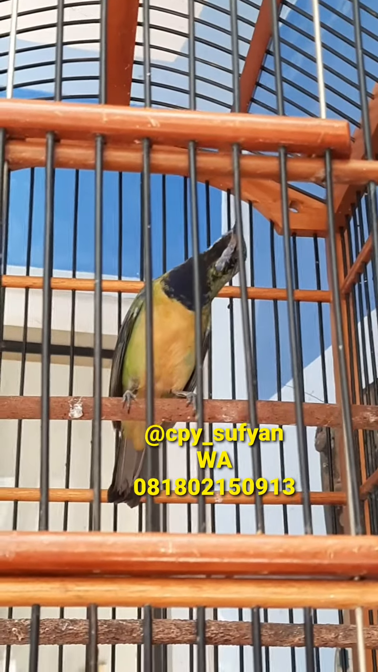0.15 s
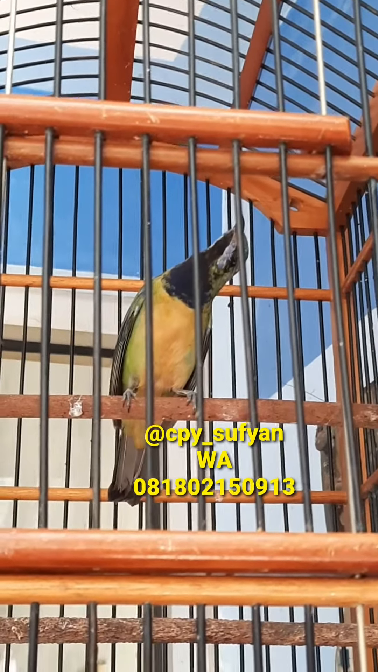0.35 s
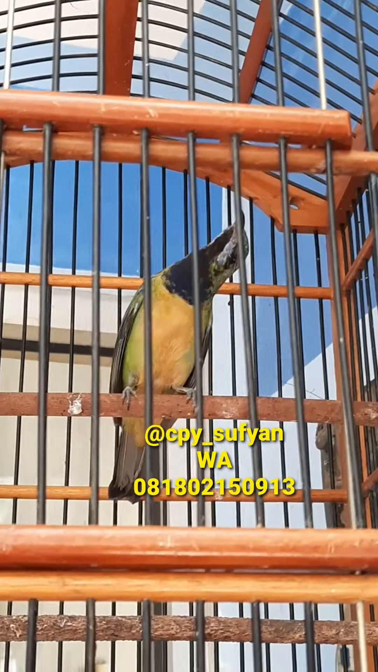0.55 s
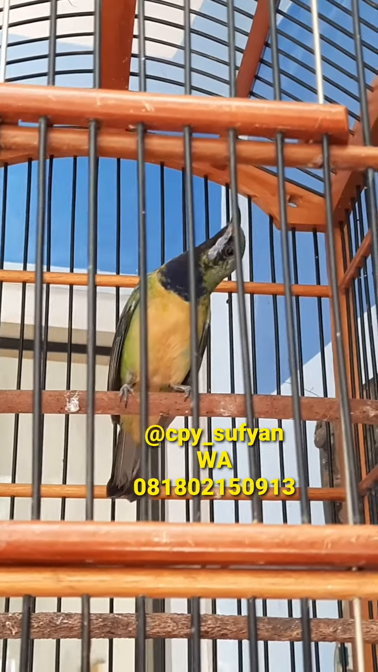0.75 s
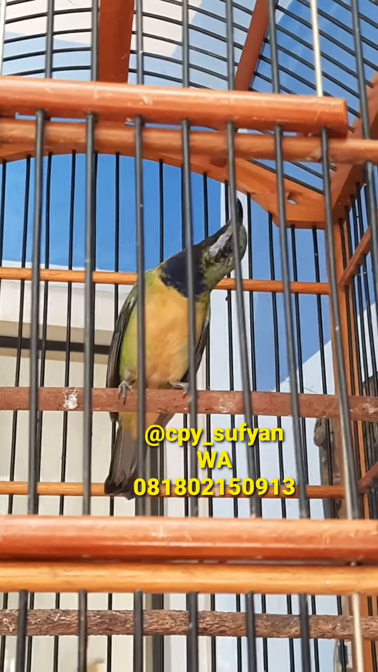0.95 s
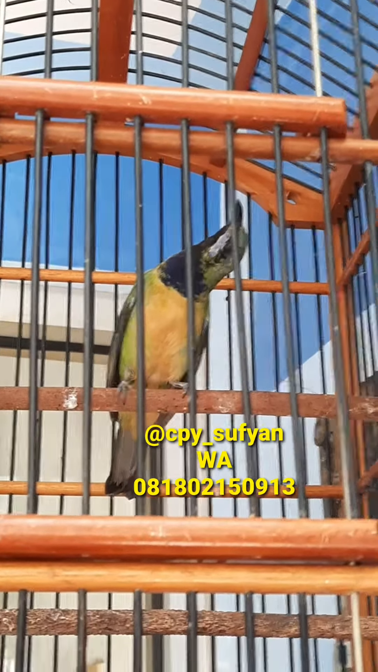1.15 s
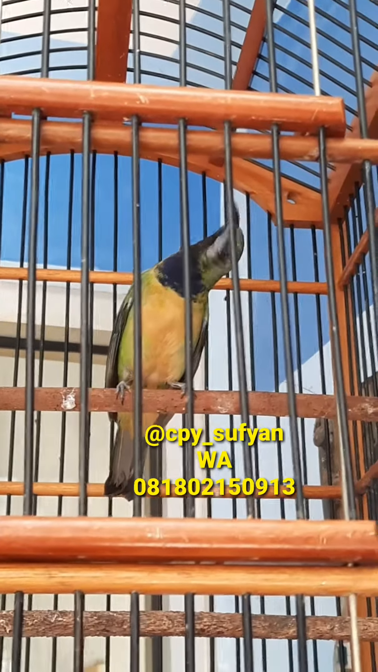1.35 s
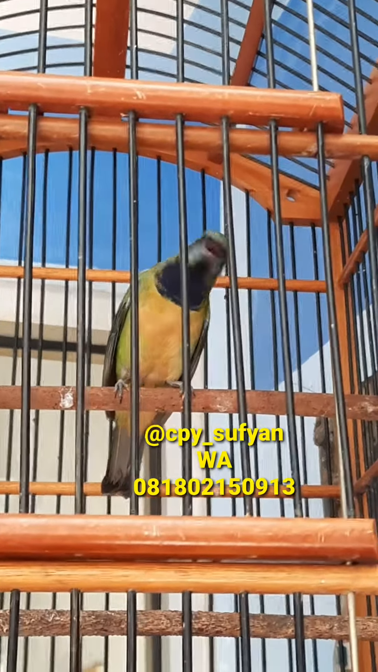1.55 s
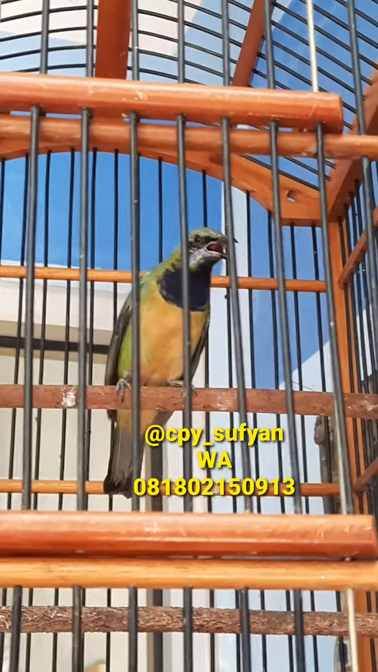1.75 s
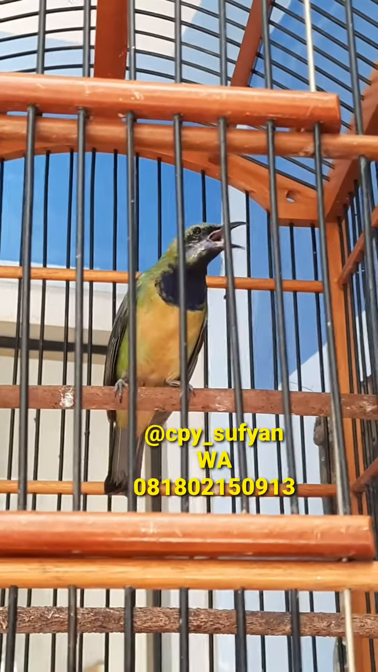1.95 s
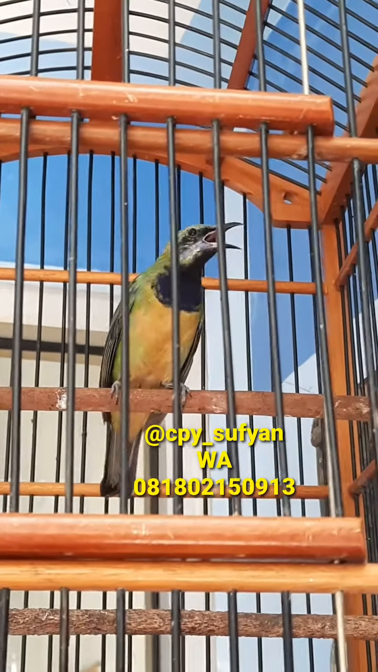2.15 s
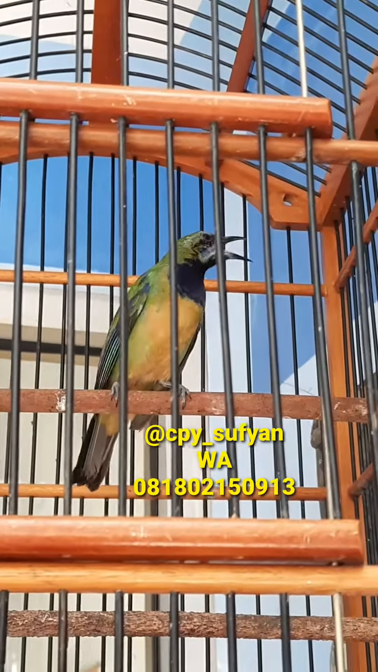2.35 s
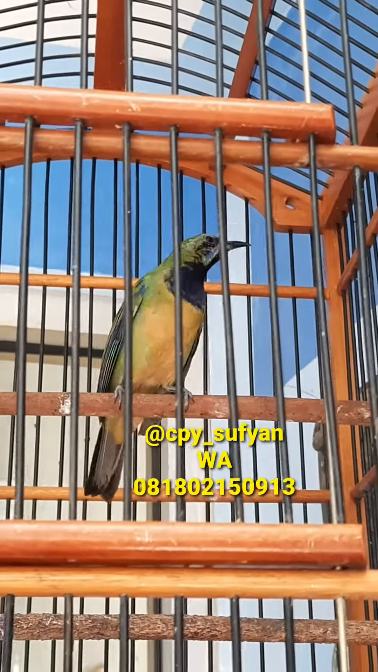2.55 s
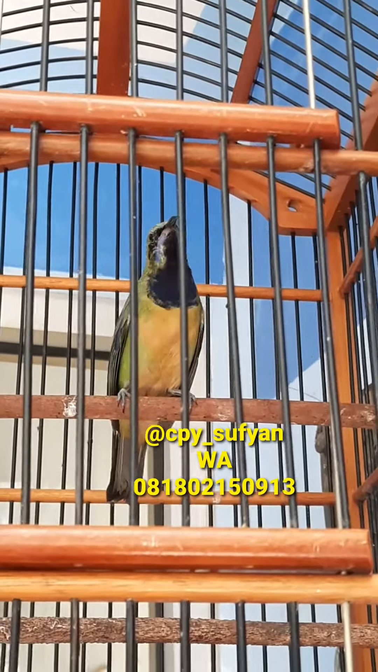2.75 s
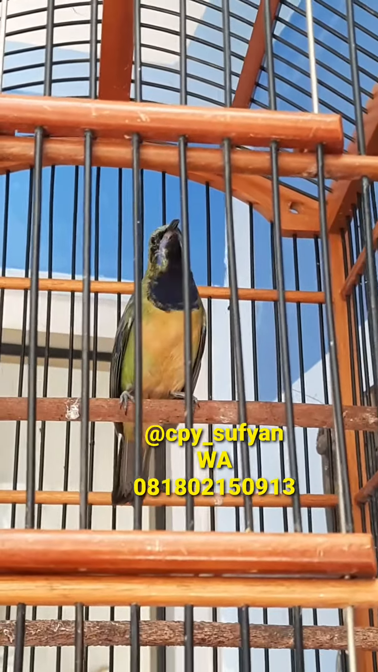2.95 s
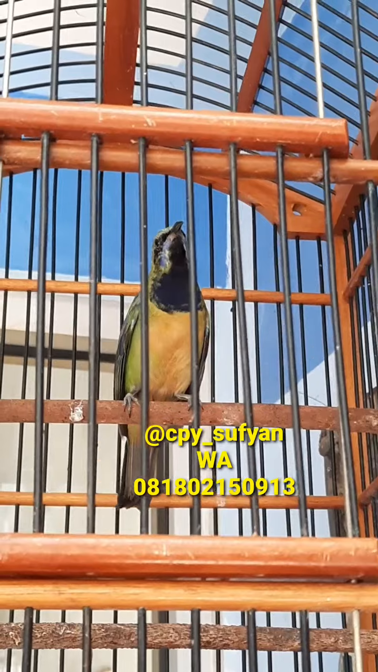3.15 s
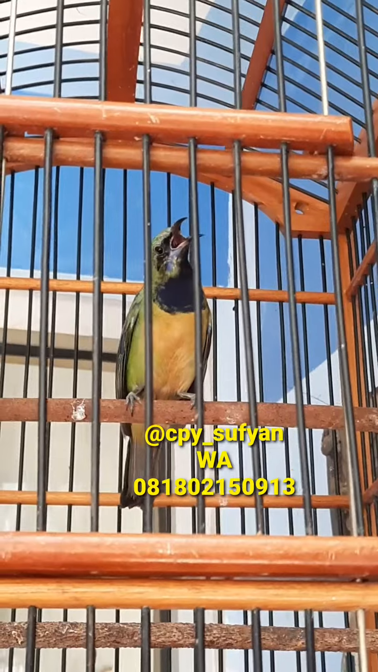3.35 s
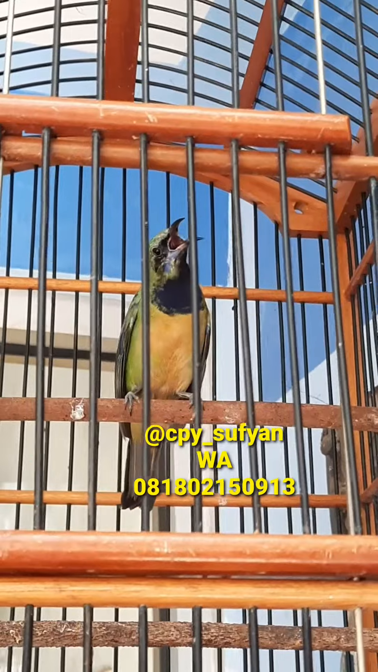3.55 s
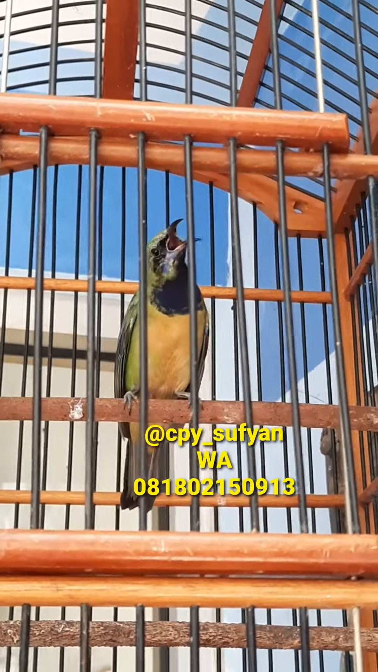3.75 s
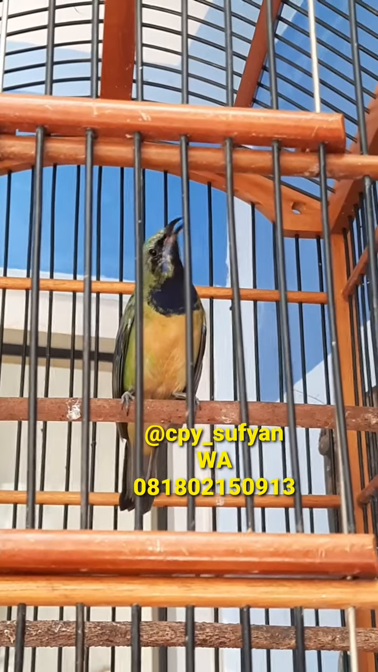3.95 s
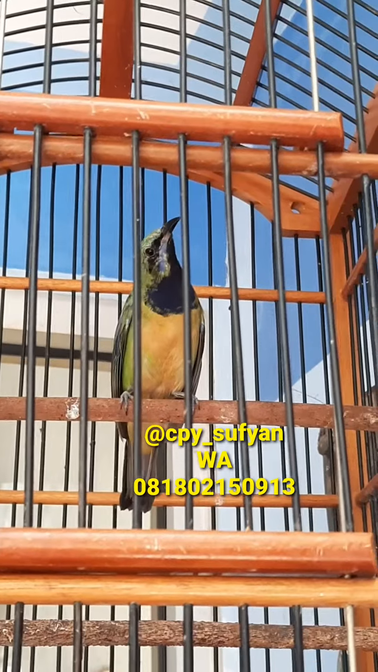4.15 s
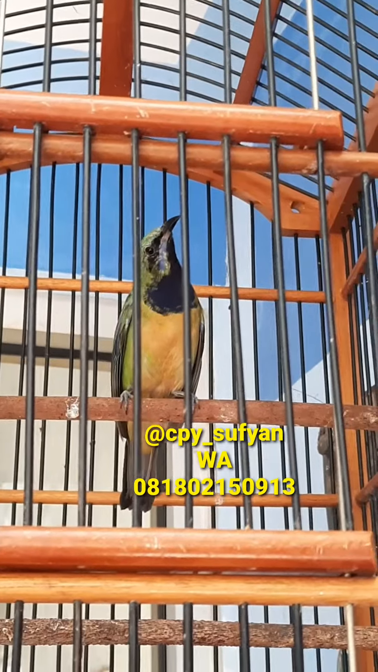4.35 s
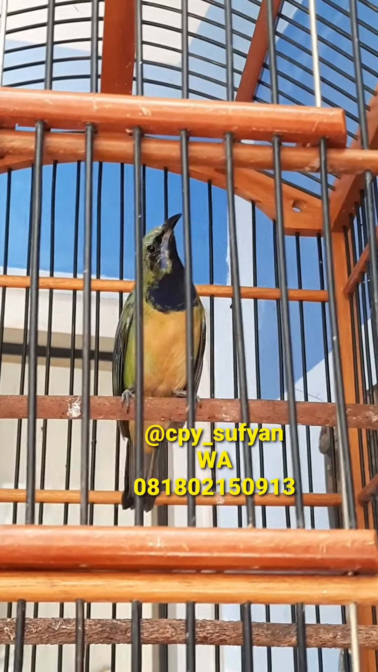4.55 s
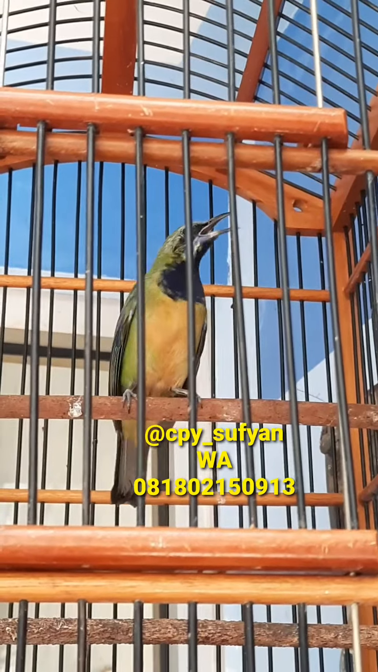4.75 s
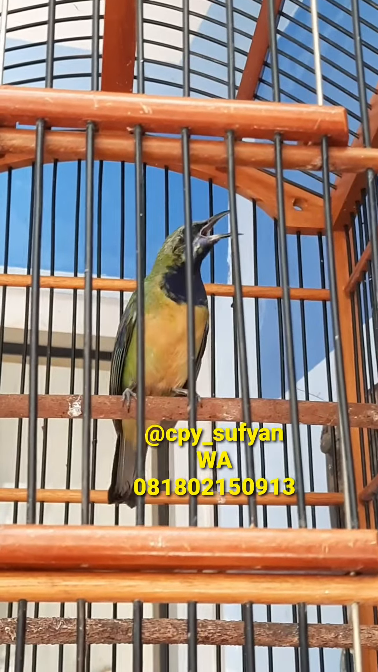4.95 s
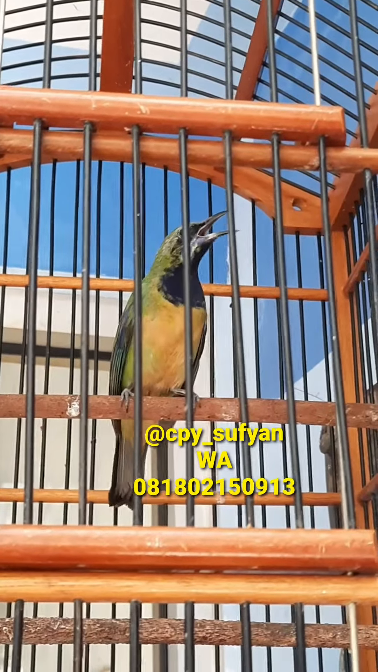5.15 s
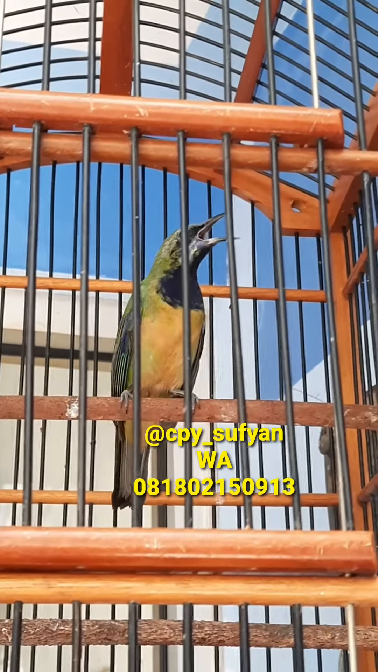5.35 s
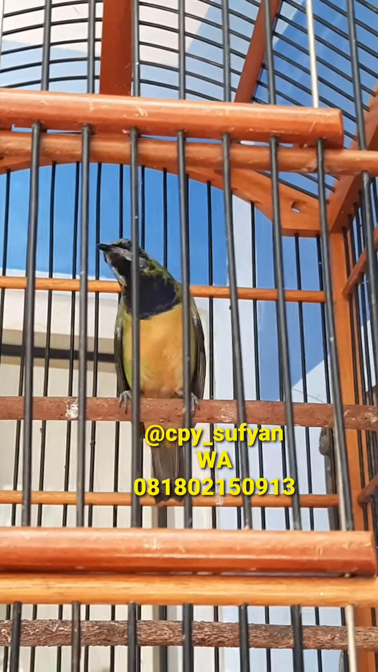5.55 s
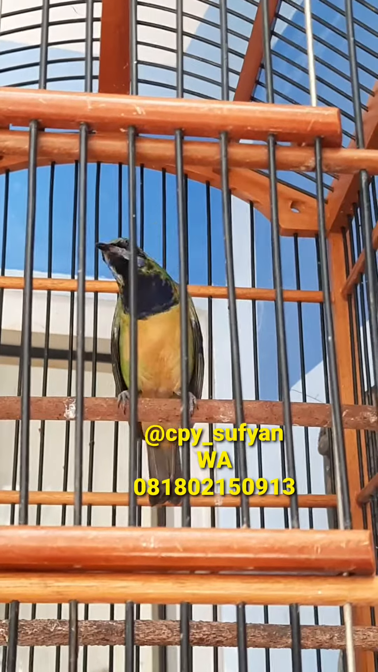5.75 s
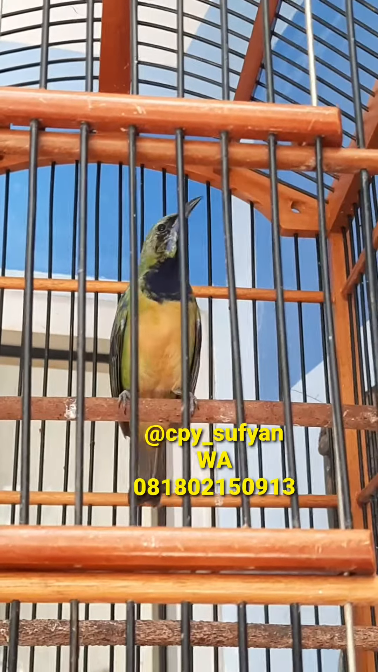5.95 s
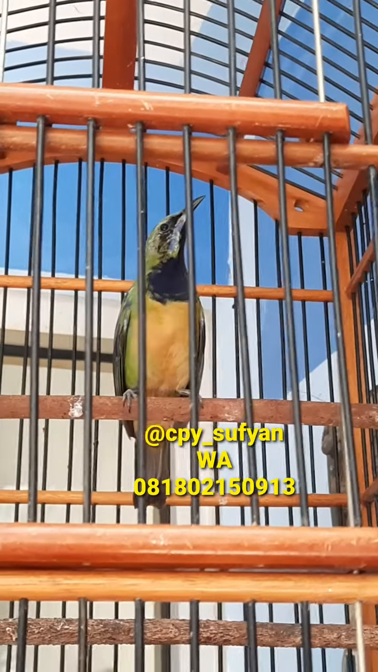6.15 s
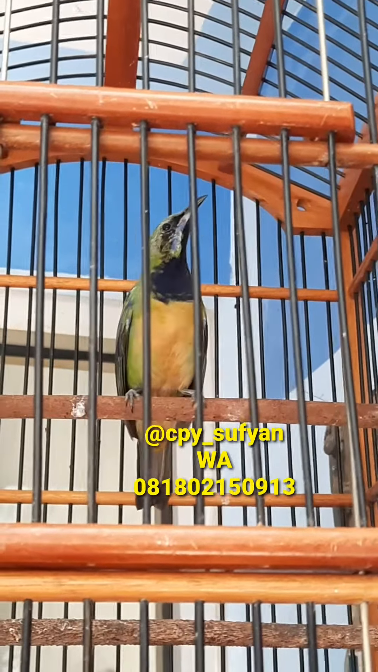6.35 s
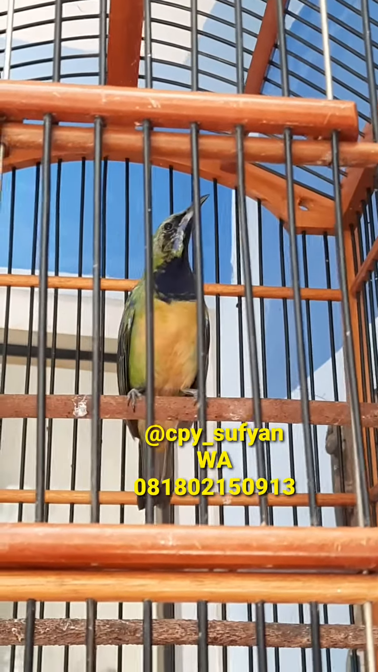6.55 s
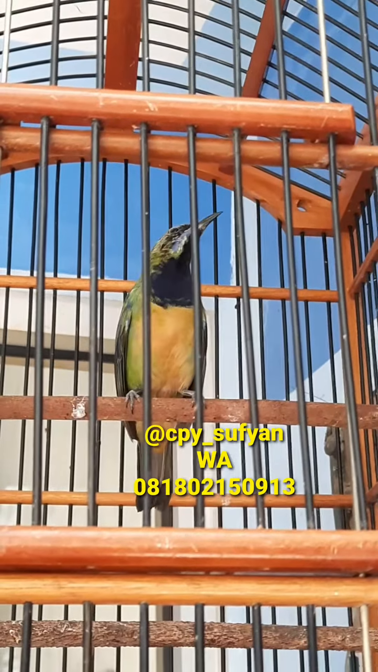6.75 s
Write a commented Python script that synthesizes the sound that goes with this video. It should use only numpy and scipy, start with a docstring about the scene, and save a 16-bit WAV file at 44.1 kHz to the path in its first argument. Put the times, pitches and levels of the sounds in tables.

```python
"""Three bursts of harsh chatter rattle out of a cage close by; sharp chips answer from a second bird on the right.
Both birds are noisy syrinx sounds, shaped by spectra and scattered by the cage; far birds whistle as rough sines.
Noise bands make the yard bustle and a faint drone, and ringing noise makes a few far knocks.
A small engine starts idling as a train of puffs in exhaust resonances, over a town hum of shaped noise."""
import sys
import numpy as np
from scipy import signal
from scipy.fft import rfft, irfft
from scipy.io import wavfile

SR = 44100
rng = np.random.default_rng(int(sys.argv[2]) if len(sys.argv) > 2 else 0)


def to_wav(sig):
    """Store sig (one row per channel, or 1-D mono) as 16-bit WAV at the path in sys.argv[1].

    Samples outside -1..1 are clipped; the rate is SR.
    """
    pcm = np.clip(np.atleast_2d(sig), -1, 1) * 32767
    pcm = np.round(pcm).astype(np.int16)
    wavfile.write(sys.argv[1], SR, pcm.T)  # frames by channels


N = 303849


def amp(db):
    """dB to gain."""
    return 10 ** (np.asarray(db) / 20)


def rms_one(x):
    """Scale to rms 1."""
    return x / np.sqrt(np.mean(x ** 2) + 1e-20)


def in_time(rows):
    """Draw a one-value automation curve at every sample."""
    s, value = np.transpose(rows)
    return np.interp(np.arange(N) / SR, s, value)


def at_hz(points, hz):
    """Read a curve on a log-frequency axis."""
    curve_hz, value = np.array(points).T
    return np.interp(np.log(hz), np.log(curve_hz), value)


def colour(x, db_at):
    """Equalise by a dB function of frequency."""
    size = x.shape[-1]
    hz = np.arange(1, size // 2 + 2) * SR / size
    return irfft(rfft(x) * amp(db_at(hz)), size)


def drift(rate, size):
    """Random wander of rms 1: noise through two equal one-pole low-passes at rate Hz."""
    r = np.exp(-2 * np.pi * rate / SR)
    wander = signal.lfilter([1], [1, -2 * r, r * r], rng.standard_normal(size + SR))
    return rms_one(wander[SR:])      # the first second lets the filter settle


def resonance(x, hz, width_hz):
    """Two-pole peak of gain 1."""
    r = np.exp(-np.pi * width_hz / SR)
    feedback = [1, -2 * r * np.cos(2 * np.pi * hz / SR), r * r]
    return signal.lfilter(np.array([1, 0, -1]) * (1 - r * r) / 2, feedback, x)


def add(track, s, sound):
    """Mix a sound in at s seconds."""
    i = round(s * SR)
    track[i:i + len(sound)] += sound[:N - i]


def rasp(size, uneven_db):
    """Chaotic syrinx: noise whose strength jumps from one millisecond to the next."""
    return rng.standard_normal(size) * amp(uneven_db * drift(620, size))


def voice(hz, size, wander, breath_db):
    """Unsteady syrinx: a harmonic-rich buzz whose pitch wanders fast, plus rasp."""
    pitch = hz * (1 + wander * drift(219.5, size) + wander * drift(29.02, size))
    phase = 2 * np.pi * np.cumsum(pitch) / SR
    buzz = sum(np.cos(k * phase) for k in range(1, 12))
    flicker = amp(3 * drift(400, size))
    return rms_one(buzz) * flicker + amp(breath_db) * rasp(size, uneven_db=4.5)


# chatter syllables: [t/s, relative level/dB, throat resonance f/Hz, swell t/s]
CHATTER = [(1.6304, -13, 5590, 0.0095), (1.699, -13, 5500, 0.0072), (1.77, -11, 3980, 0.016),
           (1.8468, -9.5, 5000, 0.019), (1.917, -10, 5830, 0.017), (2.0194, -9.5, 5610, 0.013),
           (2.0988, -11, 4040, 0.018), (2.1843, -9.5, 4980, 0.0063), (2.2511, -10.5, 5270, 0.018),
           (2.324, -10, 6190, 0.0032), (2.3854, -14, 6300, 0.0043), (2.441, -19.5, 6400, 0.0037),
           (3.3389, -20, 5740, 0.015), (3.412, -15.5, 5300, 0.0097), (3.4831, -11.5, 5270, 0.016),
           (3.5713, -10.5, 5540, 0.025), (3.6452, -11, 5740, 0.0087), (3.7153, -12, 4330, .018),
           (3.7943, -11.5, 6090, 0.022), (3.869, -12.5, 6730, 0.0072), (4.8344, -19.5, 6660, 0.0061),
           (4.9023, -18.5, 6760, 0.011), (4.9726, -12.5, 4426, 0.016), (5.038, -10.5, 5305, 0.013),
           (5.1138, -14, 5345, 0.0031), (5.1886, -14, 5300, 0.0084), (5.2675, -14, 4830, 0.014),
           (5.3427, -14, 6610, 0.0074), (5.406, -12, 5000, .015)]
# chatter spectrum: [f/Hz, relative level/dB]
CHATTER_SPECTRUM = [(760, -62), (1300, -23), (1760, -3), (2200, 1.5), (3000, 1), (4100, 8.5), (4500, 7),
                    (5600, 10.5), (6400, 6), (7400, -5), (8300, -7), (10000, -15), (12000, -12),
                    (14500, -15)]
LEAD_S, FADE_S, BURST_GAP_S = .016, .014, .3   # a longer gap between syllables opens a new burst
TREBLE_DB = 7   # lift above about 8 kHz
LOW_START_DB, LOW_SAG_DB_PER_S = 6, 12   # below about 3.3 kHz a burst starts full and thins out


def chatter():
    """Each syllable swells, then fades; the throat lifts the fourth harmonic of the buzz."""
    out, t = np.zeros(N), np.arange(4096) / SR
    last = -1
    for s, db, hz, swell in CHATTER:
        if s - last > BURST_GAP_S:
            burst = s
        last = s
        low_db = LOW_START_DB - LOW_SAG_DB_PER_S * (s - burst)

        def shape(f):
            throat = 4 * np.exp(-((f - hz) / 400) ** 2)
            treble = TREBLE_DB / (1 + (8000 / f) ** 6)
            low = low_db / (1 + (f / 3300) ** 6)
            return at_hz(CHATTER_SPECTRUM, f) + throat + treble + low

        top = swell + LEAD_S
        rise = np.sin(np.pi / 2 * t / top)
        fade = np.exp(-(np.maximum(t - top, 0) / FADE_S) ** 2)
        # beyond the top the rise may turn negative, so only its valid part is raised to a power
        envelope = np.where(t < top, np.maximum(rise, 0) ** 1.4, fade)
        source = voice(hz / 4, len(t), wander=.06, breath_db=4)
        add(out, s - LEAD_S, amp(db) * envelope * rms_one(colour(source, shape)))
    return out


# chips of the second bird: [t/s, relative level/dB, settling f/Hz, rasp level/dB, low note level/dB,
# low note f/Hz, swell t/s, hold until t/s after the start]; rasp and low note are relative to the chip
CHIPS = [(4.891, -17, 7390, -13, -37, 2540, 0.0078, 0.026), (5.1164, -18, 7100, -5, -27, 3180, .011, .013),
         (5.339, -15.5, 7690, -9, -16, 2290, 0.0074, 0.013),
         (5.5477, -27, 7600, -1, -18, 2360, 0.0017, 0.027),
         (5.7604, -20.5, 7250, -7.5, -19.5, 3220, 0.0069, 0.03),
         (5.9693, -24, 7360, -2.5, -13.5, 2930, 0.02, .019),
         (6.2038, -21.5, 7240, -5.5, -9, 3040, 0.0057, 0.016),
         (6.401, -19, 7580, -2, -1, 2990, 0.01, 0.0073), (6.6156, -22.5, 7630, -3, -4, 2200, 0.016, 0.02),
         (6.832, -25.5, 7990, -2.5, -0.5, 2080, 0.0057, .013)]
# rasp spectrum of the chips: [f/Hz, relative level/dB]
CHIP_SPECTRUM = [(350, -26), (600, -21.5), (1360, -16.5), (2000, -9), (2310, -5.5), (3140, -11.5),
                 (3840, -15), (6050, -4), (7590, -2.5), (9910, -15.5), (14600, -20)]
# beak ticks ahead of some chips: [t/s, relative level/dB]
TICKS = [(5.7545, -24), (5.957, -26), (6.1767, -28), (6.3886, -28), (6.608, -29), (6.822, -25)]


def chips():
    """A falling, broken whistle, with a rasp and a lower note trailing it; a beak tick before some."""
    out, t = np.zeros(N), np.arange(4096) / SR
    for s, db, hz, rasp_db, low_db, low_hz, swell, length in CHIPS:
        body = np.clip(t / swell, 0, 1) * np.exp(-(np.maximum(t - length, 0) / 0.0013) ** 1.2)
        pitch = hz * (1 + 0.1063 * np.exp(-t / 0.0043) - 1.4 * t + 0.043 * drift(614, len(t)))
        broken = drift(140, len(t))      # the note breaks into bursts of a few milliseconds
        tone = broken * np.sin(2 * np.pi * np.cumsum(pitch) / SR)

        hiss = rms_one(colour(rasp(len(t), uneven_db=0.5), lambda f: at_hz(CHIP_SPECTRUM, f)))
        hiss_fade = np.exp(-(np.maximum(t - length - .004, 0) / 0.0086) ** 1.36)
        trailing = np.clip(t / (swell + 0.0051), 0, 1) * hiss_fade

        low = rms_one(resonance(rasp(len(t), uneven_db=5.0), low_hz, 350))
        low_fade = np.exp(-(np.maximum(t - length - .005, 0) / 0.0044) ** 2.0)
        late = np.clip((t - .011) / 0.01, 0, 1) * low_fade

        chip = body * tone + amp(rasp_db) * trailing * hiss + amp(low_db) * late * low
        add(out, s, amp(db) * chip)
    for s, db in TICKS:
        snap = resonance(resonance(rng.standard_normal(len(t)), 9000, 3000), 9400, 4000)
        add(out, s, amp(db) * np.exp(-t / 0.00024) * rms_one(snap))
    return out


# stereo lean of the chattering bird: [f/Hz, left minus right level/dB]
CHATTER_LEAN = [(60, 1.0), (180, 2.0), (550, 29), (1650, 10), (4970, 5.5), (15000, 4.5)]
# stereo lean of the second bird: [f/Hz, left minus right level/dB]
CHIP_LEAN = [(400, -32), (2400, -8.5), (7500, -16), (11000, -6), (15000, 3)]
HEAD_TURNS_PER_S, STILL_SHARE = 3.3, .7   # and the gain of the scatter that does not shift


def cage(x, lean, scatter_db, count):
    """Bars and roof scatter a bird, mostly its treble, for milliseconds; the pattern shifts as the head moves."""
    t, x = np.arange(800) / SR, np.append(x, 0)
    bright = signal.lfilter([1, -.85], 1, rng.standard_normal((3, 2, len(t))))
    paths = amp(scatter_db) * np.exp(-t / 0.0033) * bright
    head = 2 * np.pi * HEAD_TURNS_PER_S * np.arange(len(x)) / SR
    shares = (STILL_SHARE, np.cos(head), np.sin(head))
    scattered = sum(signal.fftconvolve((x * share)[None], way, axes=1) for share, way in zip(shares, paths))

    even = N + N % 2
    direct = np.array([np.roll(x, count), x])     # left late by count samples, early if negative
    left, right = scattered[:, :even] + direct[:, :even]
    half = lambda hz: at_hz(lean, hz) / 2
    return np.array([colour(left, half)[:N], colour(right, lambda hz: -half(hz))[:N]])


# far whistles: [t/s, length t/s, first f/Hz, middle f/Hz, last f/Hz, relative level/dB, roughness (held to 0-1)]
WHISTLES = [(.1, 0.19, 5980, 6240, 5820, -35, 0.14), (0.616, 0.15, 4560, 4720, 4720, -45, 0.1),
            (0.691, 0.16, 6830, 6930, 7150, -51.5, 0.2), (1.02, 0.092, 6500, 6300, 5700, -53.5, .8),
            (1.37, 0.21, 5480, 5440, 5500, -44.5, .3), (1.449, .17, 5670, 6400, 5800, -36, .5),
            (2.637, 0.083, 5200, 5350, 5480, -47, 0.7), (2.7, 0.22, 5710, 6065, 5590, -44, 0.3),
            (2.837, .1, 5440, 4970, 4570, -46, 1), (3.04, .08, 5720, 5300, 4640, -46.5, 1.05),
            (3.102, 0.11, 4300, 4240, 4400, -57.5, .6), (3.245, 0.083, 6570, 6680, 6700, -57, .2),
            (4.012, 0.15, 5720, 6200, 6500, -39.5, 0.8), (4.09, 0.095, 6950, 6870, 6930, -45, .4),
            (4.138, 0.095, 5900, 5740, 5710, -38, 0.1), (4.23, 0.18, 5680, 5680, 5600, -58, 0.4),
            (4.555, 0.17, 5370, 5390, 5350, -51, 0.9), (4.586, 0.15, 7140, 6500, 6530, -52.5, 1),
            (4.67, 0.14, 5250, 5040, 4620, -52, 1), (4.765, 0.062, 2500, 2520, 2420, -48.5, .2),
            (5.9, .06, 4650, 4730, 4650, -51, .8), (6.503, 0.098, 4776, 4790, 5010, -42.5, 0.14),
            (6.753, .15, 5570, 5800, 5450, -43, .25)]
WHISTLE_RISE_S, WHISTLE_END_S, WHISTLE_SAG_DB = 0.02, 0.024, 9.5   # each note rises, sags by this much, ends


def whistles():
    """Sines that arch through three pitches; roughness spreads them into a band by fast random beating."""
    out = np.zeros(N)
    wobble, flutter, beating = 1 + .003 * drift(100, N), amp(4 * drift(30, N)), drift(400, N)
    for s, length, first_hz, middle_hz, last_hz, db, rough in WHISTLES:
        span = slice(round(s * SR), min(round((s + length) * SR), N))
        t = np.arange(span.stop - span.start) / SR
        part, rough = t / length, np.clip(rough, 0, 1)
        arch_hz = (2 * middle_hz - first_hz - last_hz) * 2 * part * (1 - part)
        hz = first_hz + (last_hz - first_hz) * part + arch_hz
        tone = np.sin(2 * np.pi * np.cumsum(hz * wobble[span]) / SR)
        edge = np.clip(np.minimum(t / WHISTLE_RISE_S, (length - t) / WHISTLE_END_S), 0, 1)
        strength = np.sqrt(1 - rough) + np.sqrt(rough) * beating[span]
        out[span] += edge * amp(db - WHISTLE_SAG_DB * part) * flutter[span] * strength * tone
    return out


# likeness of the channels in far sound: [f/Hz, left-right correlation]
LIKENESS = [(60, 0.87), (240, 0.96), (950, -0.16), (3770, 0.024), (15000, -0.062)]


def far_noise(spectrum):
    """Stereo noise, alike in the bass and unrelated in the treble."""
    def share(sign):
        """Level of the mid (sign 1) or side (sign -1) that gives the wanted likeness."""
        likeness = lambda hz: np.clip(at_hz(LIKENESS, hz), -.98, .98)
        return lambda hz: at_hz(spectrum, hz) + 10 * np.log10(1 + sign * likeness(hz))

    mid, side = rng.standard_normal((2, N + N % 2))
    mid, side = colour(mid, share(1))[:N], colour(side, share(-1))[:N]
    return rms_one(np.array([mid + side, mid - side]))


# bustle of far birds: [t/s, level/dB]
BUSTLE = [(0, -36.5), (.266, -36), (.426, -53), (.84, -47.5), (.948, -43), (1.09, -54), (1.158, -40),
          (1.31, -47.5), (1.386, -40), (1.6, -34), (2.55, -42), (2.79, -49), (3.02, -53), (3.14, -47),
          (3.3, -55), (3.98, -51), (4.21, -48), (4.37, -52), (4.62, -49), (4.81, -55), (5.62, -41),
          (5.74, -50), (6.05, -56.5), (6.6, -51), (6.89, -44)]
# level of the treble hiss: [t/s, level/dB]
HISS = [(0, -50.5), (.266, -49), (.426, -68), (.52, -55), (.56, -74), (.836, -50), (.948, -55),
        (1.006, -49), (1.104, -58), (1.158, -43.5), (1.278, -54.5), (1.386, -44.5), (1.6, -47.5),
        (2.55, -50.5), (2.86, -59), (2.904, -52), (3.022, -61), (3.12, -53), (3.32, -67), (3.98, -48),
        (4.1, -49.5), (4.374, -66), (4.622, -52), (4.81, -64), (5.62, -53), (5.93, -55), (6.05, -68),
        (6.29, -54), (6.6, -60), (6.89, -47)]
# spectrum of the bustle: [f/Hz, relative level/dB]
BUSTLE_SPECTRUM = [(710, -27), (1200, -13), (1430, -25), (1900, -10.5), (3570, -10), (5370, -11),
                   (6180, -12), (8500, -28.5), (11000, -67), (18700, -120)]
# spectrum of the treble hiss: [f/Hz, relative level/dB]
HISS_SPECTRUM = [(4120, -34), (7000, 10), (7840, 4), (13900, 0.5), (14900, -30), (15100, -31), (15200, -73)]


def bustle():
    """Far birds blur into two wide noise bands, each riding its own level curve."""
    low = amp(in_time(BUSTLE) + 0.91 * drift(9.4, N)) * far_noise(BUSTLE_SPECTRUM)
    high = amp(in_time(HISS) + 1.0 * drift(5.4, N)) * far_noise(HISS_SPECTRUM)
    return low + high


# far knocks: [t/s, relative level/dB, f/Hz, t60 t/s]
KNOCKS = [(0.559, -39, 1930, 0.34), (.9, -38.5, 2170, 0.27), (.936, -45.5, 1890, .67),
          (1.137, -42.5, 1070, 0.18), (1.256, -44.5, 2950, .16), (2.449, -35, 1080, 0.067),
          (4.637, -57, 1270, 0.25)]


def knocks():
    """Blows far away arrive as a dying band of noise around one pitch, with a weaker, wider band below."""
    out, t = np.zeros(N), np.arange(SR // 2) / SR
    for s, db, hz, t60 in KNOCKS:
        noise = rng.standard_normal(len(t))
        main = rms_one(resonance(noise, hz, 160))
        lower = amp(-8.5) * rms_one(resonance(noise, 0.44 * hz, 1100))
        add(out, s, amp(db - 60 * t / t60) * np.clip(t / 0.0028, 0, 1) * (main + lower))
    return out


# engine level: [t/s, relative level/dB]
ENGINE = [(1.39, -36.5), (1.83, -35.5), (1.97, -40), (3.1, -41.5), (4.1, -40.5), (4.38, -43.5),
          (4.8, -34.5), (4.94, -42), (5.04, -38.5), (5.16, -44), (5.19, -44), (5.36, -44), (5.79, -44),
          (6.02, -43.5), (6.29, -46.5), (6.72, -40), (6.89, -44)]
# mean firing rate, before a slight wander: [t/s, firings per s]
FIRING = [(1.39, 25), (2.2, 27.2), (4.4, 27.5), (4.6, 20.3), (4.95, 19.5), (5.2, 27), (6.89, 27)]
# exhaust resonances, the silencer can last: [f/Hz, width f/Hz, relative level/dB]
EXHAUST = [(60.6, 36, -18), (78, 17, 0.5), (113, 19.5, -6.5), (322, 94, -13.5)]


def engine():
    """One soft puff per firing, every other one weaker, into the exhaust resonances."""
    firings = np.cumsum(in_time(FIRING) * (1 + .04 * drift(8, N))) / SR
    at = np.flatnonzero(np.diff(np.floor(firings)) > 0)
    puffs = np.zeros(N) + 1e-18
    weaker_db = -6 * (np.arange(len(at)) % 2)
    puffs[at] = amp(weaker_db + 2.5 * rng.standard_normal(len(at)))
    body = signal.sosfilt(signal.butter(3, [48, 150], "band", fs=SR, output="sos"), puffs)
    pipe = sum(amp(db) * rms_one(resonance(body, hz, width_hz)) for hz, width_hz, db in EXHAUST[:-1])
    hz, width_hz, db = EXHAUST[-1]      # the silencer can rings higher
    can = resonance(resonance(puffs, hz, width_hz), hz, width_hz)
    pipe = pipe + amp(db) * rms_one(can)
    started = np.clip((np.arange(N) / SR - ENGINE[0][0]) / 0.046, 0, 1)
    return started * amp(in_time(ENGINE)) * rms_one(pipe)


# faint drone: [t/s, level/dB]
DRONE = [(0, -53), (.1, -47), (.5, -63.5), (1.1, -58.5), (1.4, -51.5), (2.9, -64.5), (3.1, -62), (4.8, -62),
         (5.7, -84), (6.89, -60)]
DRONE_HZ, DRONE_WIDTH_HZ, DRONE_WAVER_DB = 643, 97, 2


def drone():
    """A narrow band of noise holds one blurred pitch and wavers in level."""
    band = rms_one(resonance(rng.standard_normal(N), DRONE_HZ, DRONE_WIDTH_HZ))
    return amp(in_time(DRONE) + DRONE_WAVER_DB * drift(4.5, N)) * band


# town hum spectrum: [f/Hz, relative level/dB]
TOWN = [(15, -62), (25, -86), (54, 4.5), (73, -9), (88, -8), (143, -6), (238, -16.5), (311, -1.5),
        (491, -14.5), (576, -18), (934, -18.5), (1780, -19), (3300, -27.5), (14000, -36.5), (15200, -39)]
TOWN_DB = -47


def town():
    """Distant hum: bass-heavy noise that swells gently."""
    return amp(TOWN_DB + 1.2 * drift(3, N)) * far_noise(TOWN)


YARD_T60_S, YARD_LOWPASS_HZ = 0.29, 21000


def yard(x):
    """Walls return a dense dying tail, about equally bright throughout and unlike in the two channels."""
    t = np.arange(SR // 2) / SR
    noise = rng.standard_normal((2, len(t)))
    lowpassed = signal.sosfilt(signal.butter(1, YARD_LOWPASS_HZ, fs=SR, output="sos"), noise)
    reflections = lowpassed + (noise - lowpassed) * amp(-200 * t)
    tail = amp(-60 * t / YARD_T60_S) * np.clip(t / 0.0064, 0, 1) * reflections
    return signal.fftconvolve(x[None], tail / np.sqrt(np.sum(tail[0] ** 2)), axes=1)[:, :N]


def place(x, pan_db, count):
    """Pan by left minus right dB, with the left late by count samples (early if negative)."""
    return np.array([np.roll(x, count) * amp(pan_db / 2), x * amp(-pan_db / 2)])


def scene():
    """All sources, placed and given their share of the yard."""
    near, right, far, blows, motor = chatter(), chips(), whistles(), knocks(), engine()
    birds = amp(-10.0) * cage(near, CHATTER_LEAN, -13.5, count=-5)
    birds = birds + cage(right, CHIP_LEAN, -15.5, count=13)
    birds = birds + amp(3.5) * place(far, -15.0, count=4)
    bird_send = amp(-9.0) * near + amp(-4.0) * right + amp(7.0) * far
    wet = yard(bird_send + amp(7.0) * blows + amp(-13.5) * motor)
    yard_work = place(blows, 4.5, count=-8) + place(motor, 1.2, count=-8)
    return birds + wet + bustle() + yard_work + drone() + town()


CUTOFF_HZ = 14600


def record(dry):
    """Peaks are rounded, the top is cut steeply."""
    rounded = .9 * np.tanh(dry / .9)
    return signal.sosfilt(signal.ellip(9, .5, 65, CUTOFF_HZ, fs=SR, output="sos"), rounded)


dry = scene()
out = record(dry)
to_wav(out)
```